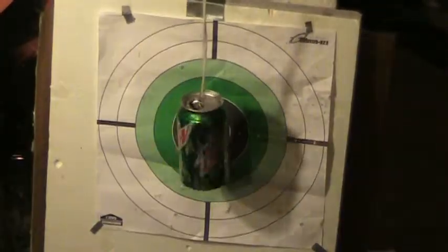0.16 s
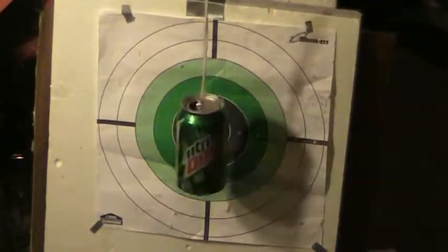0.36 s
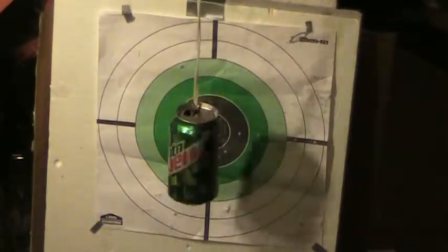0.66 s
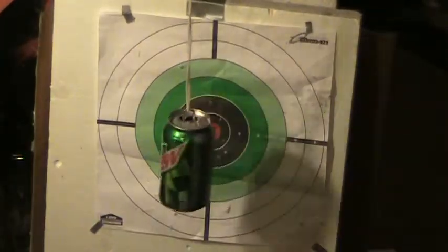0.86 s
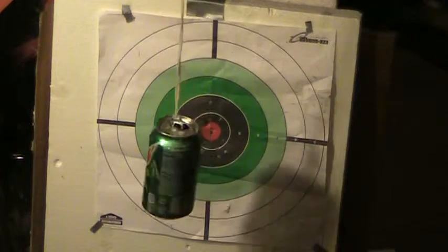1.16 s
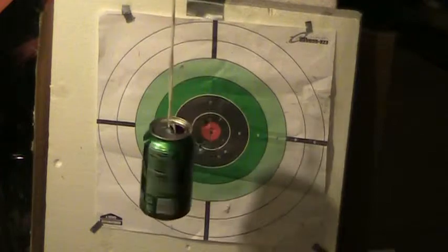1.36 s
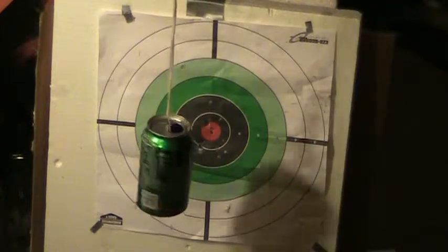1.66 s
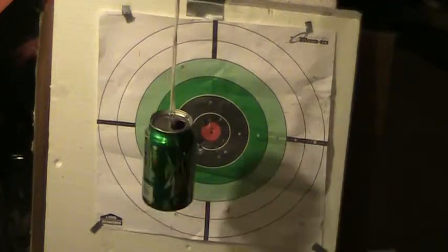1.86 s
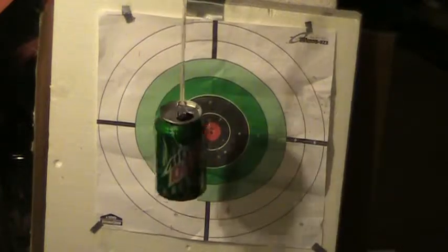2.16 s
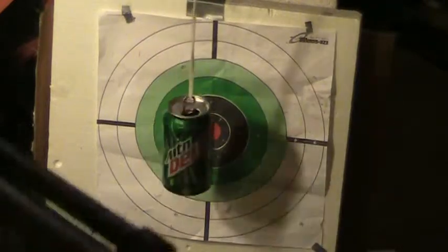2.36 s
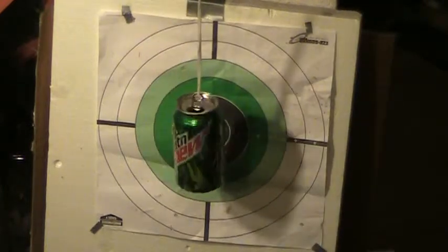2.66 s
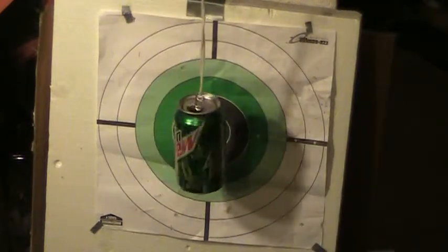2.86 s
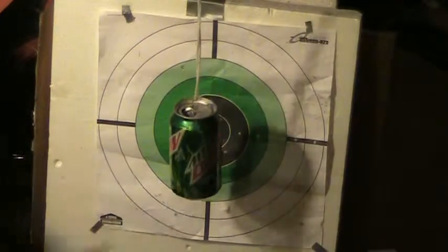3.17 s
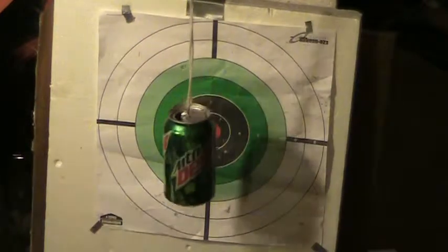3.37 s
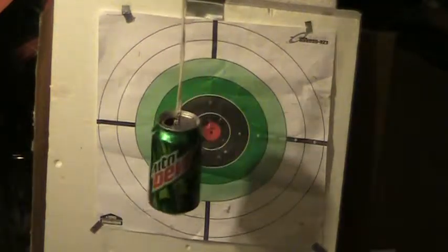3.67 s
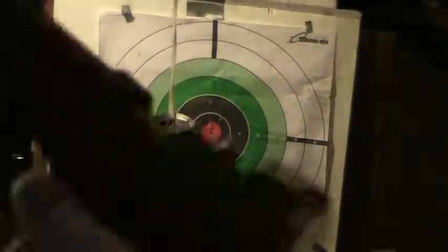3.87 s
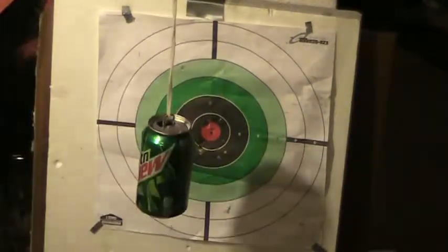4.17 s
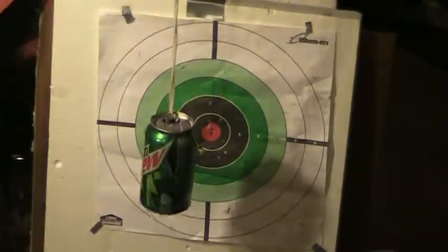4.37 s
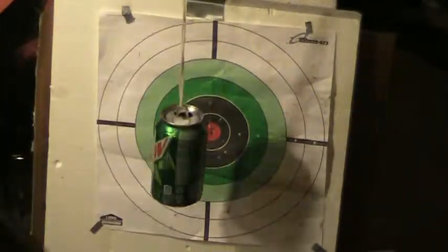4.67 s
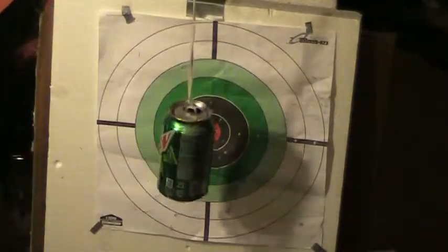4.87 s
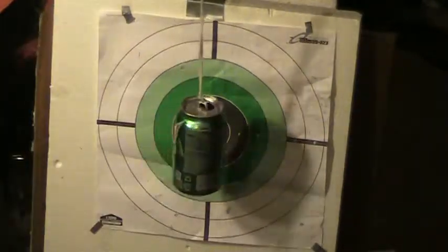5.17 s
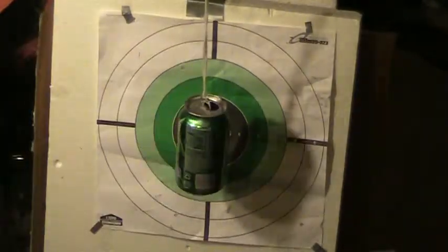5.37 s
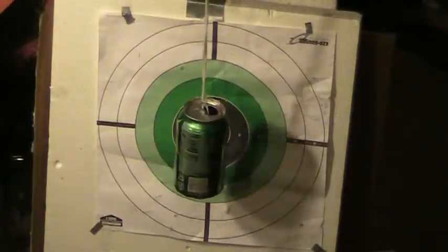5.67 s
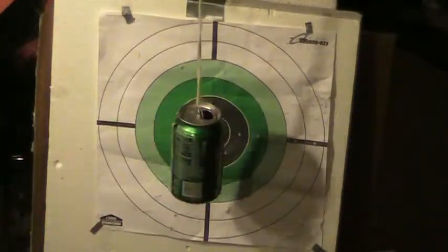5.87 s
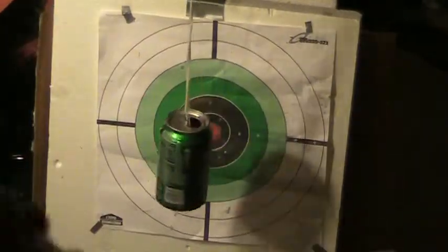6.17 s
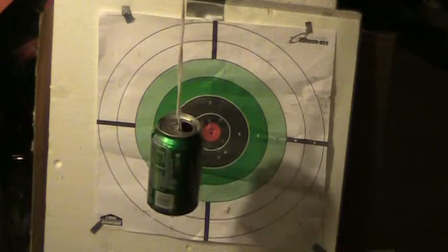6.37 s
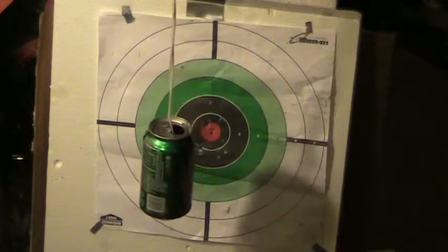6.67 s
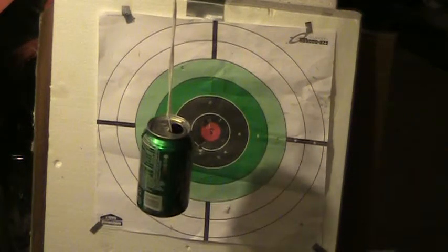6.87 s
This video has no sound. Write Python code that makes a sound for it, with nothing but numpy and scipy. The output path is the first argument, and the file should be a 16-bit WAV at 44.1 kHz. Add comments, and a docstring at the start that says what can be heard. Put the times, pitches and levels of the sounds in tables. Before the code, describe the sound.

The fading end of a slam opens the scene, followed by nine pumping strokes, one roughly every three quarters of a second. Light clicks lead to a clack, then a dry, hard, distorted metal slam with a short room tail. Loose linkage ticks, the grip rustles softly and a spring occasionally pings faintly. The close camera microphone adds broad hiss and a low wavering hum, its level dipping after each slam.

```python
"""A pump pistol is worked beside a camcorder in a small hard-walled room, over hiss and a wavering motor hum.
The tail of an earlier slam is dying as it starts. Then, stroke after stroke: a catch clicks, the latch rattles free,
the lever hits its open stop and slams shut, overloading the input and ducking its gain. Loose parts tick, a hand
rustles on the grip, and from the second closing on a spring sometimes pings. Each blow is a short chatter of contacts
ringing one frame; a pair of close microphone ports takes the direct sound, and the walls answer."""
import sys
import numpy as np
from scipy import signal
from scipy.fft import rfft, irfft, next_fast_len
from scipy.io import wavfile
from scipy.ndimage import uniform_filter1d

SR = 44100
rng = np.random.default_rng(int(sys.argv[2]) if len(sys.argv) > 2 else 0)


def persist_wave(psi):
    """Save psi, clipped to +-1, as 16-bit WAV."""
    counts = np.round(np.clip(psi, -1, 1) * 32767).astype(np.int16)
    wavfile.write(sys.argv[1], SR, np.atleast_2d(counts).T)


N = 309008  # samples, about 7 s

# Camcorder hiss. Each row: frequency in Hz, relative density in dB per Hz.
HISS_COLOUR = [(25, -21.5), (60, -10), (150, -7), (300, -8), (500, -12.5), (800, -11.5), (1200, -17.5),
               (2000, -14.5), (3000, -19.5), (4300, -24.5), (7000, -25), (11000, -33.5), (16000, -48)]
# Motor hum. Each row: frequency in Hz, mean level in dB rms.
HUM_TONES = [(123.8, -83.5), (247.6, -58), (371.4, -87), (500.6, -68)]
# Room reverberation by band. Each row: centre in Hz, level in dB, t60 in seconds, side minus mid in dB.
ROOM_BANDS = [(194.7, -22.5, 0.035, -13.5), (430, -40.5, 0.077, 2), (750, -29, 0.25, -21),
              (1160, -30, 0.26, -12.5), (2000, -34.5, 0.25, -7.5), (3350, -33, 0.28, -7),
              (5900, -33, 0.31, -3.5), (7800, -36.5, 0.24, -3.5), (11800, -43.5, 0.3, 4),
              (15000, -37.5, 0.29, 2.5)]
# Paired microphone ports. Each row: frequency in Hz, phase by which left leads right in radians.
PORT_LEADS = [(1000, .03), (4000, .25), (8500, .5), (11000, 1.6), (16000, 1.6)]
# Frame, lever and tube modes. Each row: frequency in Hz, level in dB, t60 in seconds before a blow's ring share.
FRAME_MODES = [(467, -6.5, 0.0075), (520, 12.5, 0.011), (808, 8, 0.0061), (1260, -5.5, 0.014),
               (1400, 0, 0.013), (1510, 4.5, 0.01), (1661, -1, 0.028), (1955, 4.5, .02), (2230, 2, 0.024),
               (2460, 8.5, 0.0082), (2880, 6, 0.0097), (3276, 11.5, 0.004), (3735, 9, 0.0094),
               (4600, 6, 0.0077), (5000, -12.5, 0.035), (5200, -3.5, 0.0018), (5385, 8, 0.0084),
               (6444, 12, 0.0042), (6680, -7.5, 0.028), (7660, 9.5, 0.0072), (8780, 7, 0.0095),
               (9800, 3, 0.014), (11200, -2, 0.007), (11800, 8, 0.0045), (12100, -25.5, 0.0044),
               (13700, -2.5, .0025), (15000, -6.5, 0.0019)]
# A slam just before the start. One row: start in seconds, level in dB, centre of the ring in Hz, bass in dB, chatter in ms.
EARLIER_SLAM = (-.075, 4, 2200, -18, 5.0)
# Lever snaps shut. Each row: start in seconds, level in dB, centre of the ring in Hz, bass in dB, chatter in ms.
SLAMS = [(0.6967, 3.5, 3440, -13, 5.8), (1.3503, 2.5, 1780, -25.5, 13), (2.0109, 6.5, 2070, -16.5, 5.56),
         (2.6514, 8, 2270, -18.5, 4.54), (3.4417, 8.5, 2130, -19.5, 4.7), (4.2547, 7, 2200, -19, 7.3),
         (5.0234, 7, 2170, -19, 5.4), (5.7728, 6.5, 2210, -25.5, 12), (6.5374, 5.5, 2770, -15, 11)]
# Linkage and loose parts tick. Each row: start in seconds, level in dB, centre of the ring in Hz.
TICKS = [(0.0626, -22, 3100), (0.097, -28, 2490), (0.3088, -17, 2850), (0.4034, -27.5, 2950),
         (0.4296, -29, 1480), (0.5154, -34, 2300), (0.676, -27.5, 3600), (0.6905, -28, 3350),
         (0.927, -28, 3170), (1.0032, -41, 2000), (1.02, -20.5, 2455), (1.0702, -22, 3800),
         (1.189, -35, 1600), (1.3156, -34, 1710), (1.3413, -18, 3100), (1.6176, -40.5, 3000),
         (1.6373, -35, 3580), (1.6595, -39, 806), (1.6697, -25.5, 2400), (1.7498, -29, 2500),
         (1.8373, -38.5, 1400), (1.987, -27.5, 3630), (2.2777, -38.5, 4400), (2.3003, -34, 4140),
         (2.321, -27, 2400), (2.3865, -24.5, 3300), (2.406, -42, 2930), (2.419, -31, 1700),
         (2.4984, -39, 1720), (2.5297, -41, 900), (2.6388, -26, 2220), (2.6425, -24.5, 3260),
         (2.99, -18.5, 3430), (3.0868, -28, 2400), (3.0987, -30, 3790), (3.1239, -27.5, 1630),
         (3.1689, -39, 995), (3.356, -59.5, 3400), (3.3828, -44, 1620), (3.4295, -20, 3370),
         (3.7503, -38, 4000), (3.8078, -31, 3400), (3.8296, -29, 2400), (3.9068, -28.5, 3650),
         (4.2405, -29, 1980), (4.245, -26.5, 2630), (4.5235, -26, 2880), (4.5822, -23, 3020),
         (4.6092, -17.5, 3000), (4.6498, -23.5, 3480), (4.6651, -25, 3000), (4.797, -43, 1230),
         (4.8147, -34.5, 1200), (4.8316, -45, 1680), (4.539, -35.5, 910), (4.767, -46.5, 855),
         (4.881, -44, 1890), (5.0163, -32, 3230), (5.3659, -40.5, 3200), (5.3765, -29.5, 2400),
         (5.4524, -29.5, 2800), (5.4821, -36, 1470), (5.7145, -26, 1600), (5.7423, -40, 1410),
         (5.7526, -25.5, 3600), (6.1083, -34.5, 4010), (6.2082, -32, 1560), (6.216, -31.5, 1560),
         (6.2285, -21, 2910), (6.2393, -31, 3540), (6.2513, -33.5, 1510), (6.4224, -49.5, 1246),
         (6.4995, -37.5, 2100), (6.528, -22.5, 2040), (6.708, -33.5, 1920), (6.7296, -32.5, 1700),
         (6.7564, -36.5, 2750), (6.8932, -46, 1220), (6.904, -48, 1300), (6.9975, -38.5, 2800)]
# The catch lets go as the lever is pulled. Each row: start in seconds, level in dB.
CATCHES = [(0.069, -31), (0.8087, -23.5), (1.48, -20.5), (2.1388, -21), (2.7954, -21), (3.6033, -19),
           (4.3978, -19.5), (5.1794, -19), (5.9223, -19)]
# Colour of every catch. One row: centre in Hz, treble in dB, bass in dB, chatter in ms (below the shortest contact).
CATCH_COLOUR = (1976, -4, -48, -0.5)
# The latch rattles free. Each row: start in seconds, level in dB, treble in dB, chatter in ms.
LATCH_CLICKS = [(0.107, -12, -8, 6.7), (0.114, -18.5, -7, 3.1), (0.1337, -21, -3, 1.5),
                (0.1412, -7, -3, 1.5), (0.846, -15, -5.5, 3.1), (0.8802, -8.5, -17, 1.7),
                (0.8827, -16.5, 4.5, 5), (1.5185, -13, -10.5, 1), (1.5223, -12.5, -6, 2),
                (1.5458, -12.5, -6, 3.4), (1.555, -13.5, 2.5, 2.8), (2.1776, -23.5, -30, 1),
                (2.1813, -10, -23, 1.63), (2.1868, -16.5, -4.5, 0.75), (2.1935, -15, -6.5, 8.8),
                (2.2064, -8.5, -11.5, 1.1), (2.2099, -19.5, -11, 0.83), (2.2158, -8, -2.5, 6.3),
                (2.8425, -18, -14, 1.4), (2.8486, -12.5, -5.5, .8), (2.8514, -6.5, -8.5, 1.4),
                (2.8576, -14, 3.5, 4.5), (2.873, -14, -4, 1.5), (2.8808, -5.5, -4, 3.1),
                (3.646, -17.5, -8.5, 4.2), (3.6526, -8.5, -18, 0.86), (3.6551, -7.5, -6, 1.22),
                (3.6775, -9.5, -13, 2.1), (3.6897, -12.5, 2.5, 8.6), (4.4461, -16.5, -30, 2.4),
                (4.4545, -7.5, -5, 0.96), (4.477, -21, -6, 2.8), (4.4795, -11.5, -4.5, 1.9),
                (4.489, -10, -0.5, 3.9), (5.2297, -17, -29, 3.3), (5.2354, -9, -2, 5),
                (5.2443, -12.5, 1, 4), (5.2626, -8.5, -7.5, 1.84), (5.2697, -8, 0, 4), (5.98, -25, -3, 6.8),
                (5.9868, -5.5, -5.5, 1.4), (6.013, -8.5, -6.5, 2.4), (6.0224, -9.5, 1, 2)]
# Lever reaches its open stop. Each row: start in seconds, level in dB, centre of the ring in Hz, bass in dB, chatter in ms.
OPENS = [(0.3153, -7.5, 2060, -25, 7.5), (1.0227, -5.5, 1870, -13, 3.16), (1.6727, -5, 1860, -8.5, 2.66),
         (2.3239, -5, 2230, -9.5, 2.69), (3.0118, -6.5, 1530, -8, 8.9), (3.8338, -8.5, 1860, -9, 6),
         (4.6147, -11, 1590, -9, 4.4), (5.3797, -5.5, 1850, -15.5, 6.3), (6.1322, -2, 1580, -19, 4.5)]
# A hand shifts on the grip. Each row: loudest moment in seconds, level then in dB, rise in dB per s.
RUSTLES = [(.55, -50, 110), (.625, -56.5, 109), (1.28, -54, 71), (2.52, -55, 107), (3.17, -46, 300),
           (4.2, -72, 102), (4.82, -50.5, 145), (6.995, -40.5, 114)]
# Dull resonances under the hand. Each row: frequency in Hz, width of the first of two filters in Hz, level in dB.
GRIP_MODES = [(427, 100, 7), (780, 320, 14.5), (1250, 690, 10), (1850, 700, 4.5)]
# A spring pings faintly. Each row: start in seconds, level in dB, treble in dB.
PINGS = [(1.3085, -34, -3), (1.906, -47.5, 9), (2.613, -30, -12), (3.262, -53.5, 5), (4.1845, -42.5, -16),
         (6.7303, -40, -7)]
# Kinds of blow. Each row: rise as share of the chatter, crack in dB, contacts per ms, thump in dB, share sent to the room
# in dB, ring of the direct sound and of the all-round sound as shares of t60, width of the struck region in octaves
# (its sign is idle), share outside that region, lever ring share.
SLAM_KIND = (.12, -8, 9.5, -28, -0.5, 0.68, 0.5, -1.34, 2, 0.35)
TICK_KIND = (0.4, -9, 7, -49.5, -1.5, 0.9, 0.2, 0.67, -0.04, 0.24)
LATCH_KIND = (0.34, -10, 4, -55, -4, 1.44, 0.75, 0.76, -0.03, -0.17)  # the catch too
OPEN_KIND = (.3, -10, 7.5, -25, -2.5, .6, 1.0, .15, .2, 1.1)
PING_KIND = (.12, -25, 2.5, -53, -3, 3.2, 2.5, .05, .03, .01)

HISS_DB, HISS_SIDE_DB, HISS_FLICKER_DB = -51, -1, 0.5
HUM_WAVER_DB = 2
ROOM_GAP_MS, EARLY_DB, EARLY_T60_S = 0.98, 8.5, 0.029
POSES = 3  # sets of reflections that the blows take in turn
BASS_HZ, TREBLE_HZ = 1000, 4200  # modes outside these are levelled apart from the middle
TREBLE_RING = 0.36  # all round, the treble and bass modes ring for this further share
LEVER_HZ, LEVER_OCT = 3300, .12  # the swung-out lever rings here
SCATTER_DB = 1  # spread of the mode levels from blow to blow
LOW_CUT_HZ = 517  # a small object radiates little bass
THUMP_HZ, THUMP_T60_S = 112, 0.01
LIGHT_BLOW_HZ = 9500  # blows lighter than a slam touch for longer: their direct sound loses the top above this
SLAM_TREBLE_DB, OPEN_TREBLE_DB = -2, -1.5
TICK_MS, TICK_MID_HZ = 2.4, 2400
# a tick that rings higher is brighter and thinner: dB at the middle centre, dB per octave above it
TICK_TREBLE_DB, TICK_TREBLE_DB_PER_OCT = -7, 13.5
TICK_BASS_DB, TICK_BASS_DB_PER_OCT = -16.5, -16.5
LATCH_HZ, LATCH_BASS_DB = 2300, -30.5
RUSTLE_FALL_DB_PER_S = 221
PING_HZ, PING_BASS_DB, PING_MS = 1990, -21.5, 2.2
LEFT_DB = 0.4  # left over right
GAIN_TOP_DB, GAIN_RATIO, GAIN_ATTACK_S, GAIN_RELEASE_S = -5.5, 2.51, 0.0063, 0.15
GAIN_START = 2.4  # the envelope starts at this multiple of the top, already ducked
GAIN_STEP = 32  # samples between updates of the gain
CLIP, KNEE = 1.0, 6.0  # input ceiling, hardness of its knee
TOP_HZ = 16000


def undb(db):
    """Decibels to amplitude."""
    return 10 ** (np.asarray(db) / 20)


def unit(x):
    """Scale to an rms of 1."""
    return x / np.sqrt(np.mean(x ** 2))


def on_log(table, hz):
    """A (Hz, value) table read on a log-frequency axis."""
    f, v = np.transpose(table)
    return np.interp(np.log(np.maximum(hz, 1)), np.log(f), v)


def walk(rate):
    """Random levels held 1 / rate s and slewed twice; spread near 1."""
    k = int(SR / rate)
    held = np.repeat(rng.standard_normal(N // k + 1), k)
    return unit(uniform_filter1d(uniform_filter1d(held, k), k)[:N])


def mid_side(mid, side, side_db):
    """Left and right from their common part and their difference."""
    return mid + undb(side_db) * side * np.array([[1], [-1]])


def decay(t60, t):
    """Exponential fall by 60 dB in t60 seconds."""
    return np.exp(-np.log(1000) * t / t60)


def ring(hz, t60, t):
    """A struck mode: a sine dying away."""
    return np.sin(2 * np.pi * hz * t) * decay(t60, t)


def bell(hz, centre_hz, octaves):
    """Gaussian weight around a centre on an octave axis."""
    return np.exp(-.5 * (np.log2(hz / centre_hz) / octaves) ** 2)


def band(x, hz, width):
    """One resonance, width in Hz."""
    return signal.lfilter(*signal.iirpeak(hz, hz / width, fs=SR), x)


def hiss():
    """Camcorder hiss: coloured noise, mostly unrelated left and right, flickering slightly."""
    size = next_fast_len(N)
    colour = undb(on_log(HISS_COLOUR, np.fft.rfftfreq(size, 1 / SR)))
    mid, side = irfft(rfft(rng.standard_normal((2, size))) * colour, size)[:, :N]
    return unit(mid_side(mid, side, HISS_SIDE_DB)) * undb(HISS_DB + HISS_FLICKER_DB * walk(12))


def hum():
    """Motor hum: a few tones that waver in level and phase."""
    t = np.arange(N) / SR
    total = 0
    for hz, db in HUM_TONES:
        level = np.sqrt(2) * undb(db + HUM_WAVER_DB * walk(22))
        total = total + level * np.sin(2 * np.pi * hz * t + 1.7 * walk(24))
    return total


def room(x):
    """Dense reflections, strongest at first, dying band by band; nearly alike left and right in the lowest band."""
    size = SR // 2
    t = np.arange(size) / SR
    hz = np.fft.rfftfreq(size, 1 / SR)
    centres = [row[0] for row in ROOM_BANDS]
    early = 1 + undb(EARLY_DB) * decay(EARLY_T60_S, t)
    onset = np.clip(t * 1000 / ROOM_GAP_MS - 1, 0, 1) * early
    response = 0
    for k, (_, db, t60, side_db) in enumerate(ROOM_BANDS):
        only_this = np.arange(len(ROOM_BANDS)) == k
        share = np.sqrt(on_log(list(zip(centres, only_this)), hz))
        mid, side = irfft(rfft(rng.standard_normal((2, size))) * share, size)
        response = response + undb(db) * onset * decay(t60, t) * mid_side(mid, side, side_db)
    return signal.oaconvolve(x[None], response, axes=1)[:, :len(x)]


def blow(level_db, centre_hz, treble_db, bass_db, chatter_ms, kind):
    """Quick contacts ring the frame; where it is struck sets which modes speak. Gives direct and all-round sound."""
    rise, crack_db, per_ms, thump_db, room_db, near_ring, round_ring, octaves, rest, lever = kind
    hz, db, t60 = (column[:, None] for column in np.transpose(FRAME_MODES))
    t = np.arange(1280) / SR
    scatter, detune = rng.standard_normal((2, len(FRAME_MODES), 1))
    sign = rng.choice([-1, 1], (len(FRAME_MODES), 1))
    rings = sign * undb(db + SCATTER_DB * scatter) * ring(hz * (1 + 0.022 * detune), near_ring * t60, t)

    # over all directions the modes add as powers, into a smoother colour
    round_share = round_ring * np.where((hz > TREBLE_HZ) | (hz < BASS_HZ), TREBLE_RING, 1)
    width = np.log(1000) / (2 * np.pi * round_share * t60)
    off_centre = (np.fft.rfftfreq(len(t), 1 / SR) - hz) / width
    powers = undb(2 * db) * t60 / width * (1 + off_centre ** 2) ** -1.5

    mode_hz = hz[:, 0]
    low, high = mode_hz < BASS_HZ, mode_hz > TREBLE_HZ
    focus = bell(mode_hz, centre_hz, octaves) + lever * bell(mode_hz, LEVER_HZ, LEVER_OCT) + rest

    # contacts fall at random while the pressure lasts
    chance = rng.random((3, 600))
    gone = np.arange(1, 601) / SR * 1000 / max(chatter_ms, .3)  # time in chatter lengths
    pressure = np.minimum(gone / rise, 1) * np.exp(-(gone / 0.45) ** 2.1)
    contacts = (chance[0] < per_ms * 1000 / SR) * (2 * chance[1] - 1) * pressure
    contacts[np.argmax(pressure)] = 0.99  # the main contact

    direct = all_round = 0
    for share, part_db in ((focus * ~low * ~high, 0), (1. * high, treble_db), (1. * low, bass_db)):
        part = signal.fftconvolve(share @ rings, contacts)[:len(t)]
        loudest = np.sqrt(2 * uniform_filter1d(part ** 2, 40).max())
        part = part * undb(part_db) / loudest
        direct = direct + part
        colour = share ** 2 @ powers
        all_round = all_round + colour / colour.mean() * np.sum(part ** 2)
    sent = np.roll(irfft(np.sqrt(all_round), len(t)), 88)  # a compact pulse, centred 2 ms in
    sent[-500:] = 0

    # the many small modes blur into a crack while the parts touch
    crack = np.convolve(2 * chance[2] - 1, [1, 0, -1])[:600]
    direct[:600] += undb(crack_db + treble_db) * pressure * crack
    direct = signal.sosfilt(signal.butter(2, LOW_CUT_HZ, "high", fs=SR, output="sos"), direct)
    direct = direct + undb(thump_db) * ring(THUMP_HZ, THUMP_T60_S, t)
    return undb(level_db) * direct, undb(level_db + room_db) * sent


# The next functions list blows as (s, level dB, centre Hz, treble dB, bass dB, chatter ms).
def slams():
    """The lever snaps shut: the hardest blows."""
    return [(s, db, hz, SLAM_TREBLE_DB, bass_db, ms) for s, db, hz, bass_db, ms in [EARLIER_SLAM] + list(SLAMS)]


def ticks():
    """Loose parts tick: small blows, brighter and thinner as they ring higher."""
    rows = []
    for s, db, hz in TICKS:
        above = np.log2(hz / TICK_MID_HZ)  # octaves
        treble_db = TICK_TREBLE_DB + TICK_TREBLE_DB_PER_OCT * above
        bass_db = TICK_BASS_DB + TICK_BASS_DB_PER_OCT * above
        rows.append((s, db, hz, treble_db, bass_db, TICK_MS))
    return rows


def catches():
    """The catch lets go: one very short contact, always of the same colour."""
    return [(s, db, *CATCH_COLOUR) for s, db in CATCHES]


def latch():
    """The latch rattles free: clicks around one centre, each with its own treble and chatter."""
    return [(s, db, LATCH_HZ, treble_db, LATCH_BASS_DB, ms) for s, db, treble_db, ms in LATCH_CLICKS]


def opens():
    """The lever hits its open stop: mid-weight blows."""
    return [(s, db, hz, OPEN_TREBLE_DB, bass_db, ms) for s, db, hz, bass_db, ms in OPENS]


def pings():
    """A spring pings: few modes near one centre, left to ring long."""
    return [(s, db, PING_HZ, treble_db, PING_BASS_DB, PING_MS) for s, db, treble_db in PINGS]


def pistol():
    """Direct sound and what the walls receive from each pose; all start half a second early for the earlier slam."""
    lead, soft = SR // 2, signal.butter(2, LIGHT_BLOW_HZ, fs=SR)
    direct, sent = np.zeros(N + SR), np.zeros((POSES, N + SR))
    groups = ((slams(), SLAM_KIND), (ticks(), TICK_KIND), (catches(), LATCH_KIND), (latch(), LATCH_KIND),
              (opens(), OPEN_KIND), (pings(), PING_KIND))
    for rows, kind in groups:
        for k, (s, *how) in enumerate(rows):
            near, around = blow(*how, kind)
            if kind is not SLAM_KIND:
                near = signal.lfilter(*soft, near)
            half_rise_s = kind[0] * how[-1] / 2000  # listed times fall halfway up the rise
            at = lead + int((s - half_rise_s) * SR)
            direct[at:at + len(near)] += near
            sent[k % POSES, at:at + len(near)] += around
    return direct, sent, lead


def ports(x):
    """Two close microphone ports: the treble reaches the left one first."""
    size = next_fast_len(len(x))
    lead = on_log(PORT_LEADS, np.fft.rfftfreq(size, 1 / SR)) / 2
    return irfft(rfft(x, size) * np.exp(1j * np.array([lead, -lead])), size)[:, :len(x)]


def rustle():
    """A hand slides on the grip: uneven stick-slip grains in a few dull resonances."""
    grains = (rng.random(N) < 2500 / SR) * rng.standard_normal(N) * undb(3.0 * walk(70))  # 2500 per s
    body = sum(undb(db) * band(band(grains, hz, width), hz, 2 * width) for hz, width, db in GRIP_MODES)
    t = np.arange(N) / SR
    swell = 0
    for s, db, rise in RUSTLES:
        drop_db = np.maximum(rise * (s - t), RUSTLE_FALL_DB_PER_S * (t - s))
        swell = swell + undb(db - drop_db)
    return unit(body) * swell


def scene():
    """Everything arriving at the camcorder, the left channel slightly louder."""
    direct, sent, lead = pistol()
    # the pistol moves, so each pose meets other reflections
    heard = ports(direct) + sum(room(pose) for pose in sent)
    balance = undb(np.array([[LEFT_DB], [-LEFT_DB]]) / 2)
    return balance * (heard[:, lead:lead + N] + rustle() + hiss() + hum())


def follow(x, start):
    """Envelope that rises fast and sinks slowly."""
    peaks = x[:len(x) // GAIN_STEP * GAIN_STEP].reshape(-1, GAIN_STEP).max(axis=1)
    out, e = [], start
    for peak in peaks.tolist():
        e += (peak - e) * GAIN_STEP / SR / (GAIN_ATTACK_S if peak > e else GAIN_RELEASE_S)
        out.append(e)
    return np.interp(np.arange(len(x)), (np.arange(len(out)) + 1) * GAIN_STEP, out)


def record(dry):
    """The gain control ducks after the loudest blows; the input clips with a short knee and cuts the top."""
    top = undb(GAIN_TOP_DB)
    envelope = follow(np.abs(dry).max(axis=0), GAIN_START * top)
    ducked = dry * np.minimum(top / envelope, 1) ** (1 - 1 / GAIN_RATIO)
    clipped = ducked / (1 + np.abs(ducked / CLIP) ** KNEE) ** (1 / KNEE)
    return signal.sosfilt(signal.ellip(8, .2, 60, TOP_HZ, fs=SR, output="sos"), clipped)


dry = scene()
out = record(dry)
persist_wave(out)
```